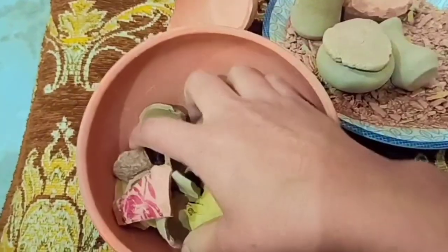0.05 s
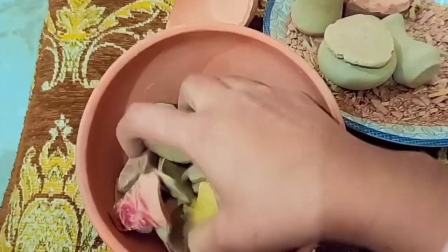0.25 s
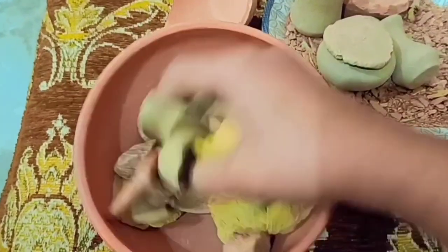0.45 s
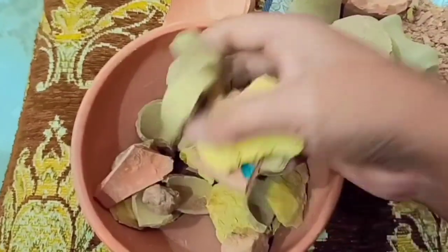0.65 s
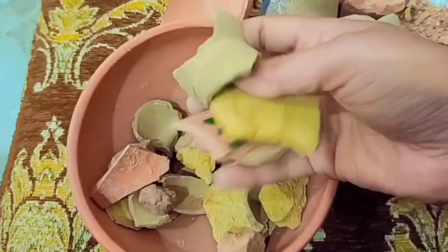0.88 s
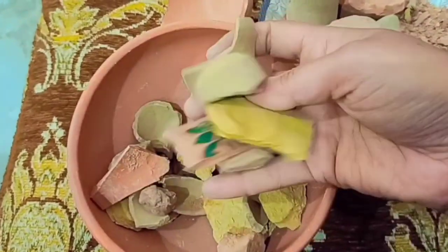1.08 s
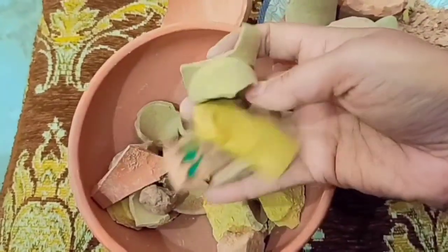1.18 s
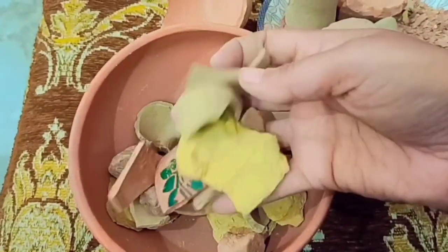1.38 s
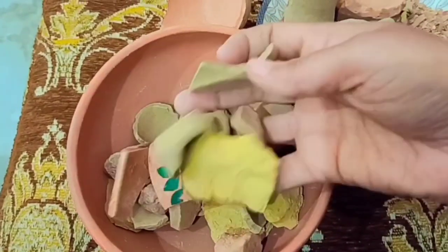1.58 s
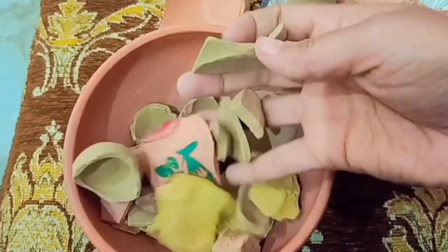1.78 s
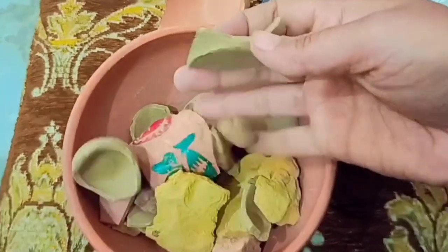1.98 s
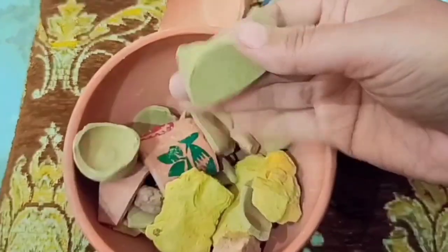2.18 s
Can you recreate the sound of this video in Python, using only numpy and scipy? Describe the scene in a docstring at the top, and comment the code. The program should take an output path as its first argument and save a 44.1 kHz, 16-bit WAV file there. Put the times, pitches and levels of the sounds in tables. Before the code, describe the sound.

Dry clay shards clack and scrape in a ceramic bowl, scooped up and dropped back.

```python
"""Over a faint hum in a small room, a hand scoops dry clay shards out of a ceramic bowl.
Stick-slip friction makes the pile grind and scrape; impacts give dry clacks, set the bowl's modes
ringing and make thin shards ping. In a lull, one flat shard rubs faintly in the lifted hand.
After one second the pieces slide back in, clacking and striking the bowl, and the hum rises
as the last of them settle."""
import sys
import numpy as np
from scipy import signal
from scipy.fft import rfft, irfft
from scipy.io import wavfile
from scipy.ndimage import uniform_filter1d

SR = 44100
rng = np.random.default_rng(int(sys.argv[2]) if len(sys.argv) > 2 else 0)


def generate_wav(signal):
    """Clip the signal to [-1, 1] and save it as 16-bit WAV at the path in sys.argv[1]."""
    frames = np.transpose(np.atleast_2d(signal))
    scaled = np.clip(frames, -1, 1) * 32767
    pcm = np.round(scaled).astype(np.int16)
    wavfile.write(sys.argv[1], SR, pcm)


N = 99225
T = np.arange(N) / SR


def from_db(db):
    """Amplitude ratio of a level in decibels."""
    return 10 ** (np.asarray(db) / 20)


def rms_one(x):
    """Normalisation to unit rms."""
    return x / np.sqrt(np.mean(x ** 2) + 1e-20)


def onset_rms_one(x):
    """Normalisation to unit rms over the first 5 ms."""
    return x / (x[:SR // 200].std() + 1e-12)


def envelope(rows, column=1):
    """Gain over time, interpolated in decibels."""
    rows = np.array(rows)
    return from_db(np.interp(T, rows[:, 0], rows[:, column]))


def colour(x, points):
    """Spectral shaping by (f/Hz, level/dB) points."""
    hz, db = np.transpose(points)
    f = np.maximum(np.fft.rfftfreq(len(x), 1 / SR), 1)
    return irfft(rfft(x) * from_db(np.interp(np.log(f), np.log(hz), db)), len(x))


def butterworth(x, kind, hz):
    """Second-order high-pass or low-pass filter."""
    return signal.sosfilt(signal.butter(2, hz, kind, fs=SR, output="sos"), x)


def resonance(x, hz, width_hz):
    """Forced response of a resonator with unit peak gain."""
    r = np.exp(-np.pi * width_hz / SR)
    feedback = [1, -2 * r * np.cos(2 * np.pi * hz / SR), r * r]
    return signal.lfilter(np.array([1, 0, -1]) * (1 - r * r) / 2, feedback, x)


def decay(t, t60):
    """Exponential damping: 60 dB in t60 seconds."""
    return np.exp(-np.log(1000) * t / t60)


def ring(hz, t60):
    """Free vibration of one damped mode."""
    t = T[:SR // 2]
    return np.sin(2 * np.pi * hz * t) * decay(t, t60)


def add(out, start_s, sound):
    """Superposition of a sound from start_s on."""
    i = int(start_s * SR)
    out[i:i + len(sound)] += sound[:N - i]


# Spectrum of the room noise: f/Hz, level/dB
NOISE_SPECTRUM = [(20, -30), (60, -3), (120, 0), (300, -7), (1000, -20), (3000, -23), (9000, -28),
                  (16000, -42)]
# Envelope of the hum: t/s, level/dB
HUM_ENVELOPE = [(0, -72), (1.7, -72), (1.85, -59), (2.25, -58)]


def background(noise_db=-66.5, hum_hz=126):
    """Superposition of broadband room noise and a low pure tone."""
    noise = from_db(noise_db) * rms_one(colour(rng.standard_normal(N), NOISE_SPECTRUM))
    hum = np.sqrt(2) * envelope(HUM_ENVELOPE) * np.sin(2 * np.pi * hum_hz * T)
    return noise + hum


def slips(slips_per_s=3000, spread_db=3.2, flutter_per_s=90, flutter_db=2.5):
    """Stick-slip friction: rough faces advance in dense, uneven jerks."""
    sizes = from_db(spread_db * np.minimum(rng.exponential(1, N), 4)) * rng.choice([-1, 1], N)
    flutter = np.interp(T * flutter_per_s, np.arange(N), rng.standard_normal(N))
    slipping = rng.random(N) < slips_per_s / SR
    return sizes * slipping * from_db(flutter_db * flutter)


def scraped(modes, shifts_per_s=25, shift_db=5):
    """Frictional excitation: each resonance swells and fades as the contacts shift."""
    out = np.zeros(N)
    for hz, width_hz, db in modes:
        contact = np.interp(T * shifts_per_s, np.arange(N), np.clip(rng.standard_normal(N), -1.5, 1.5))
        force = slips() * from_db(shift_db * contact)
        out += from_db(db) * rms_one(resonance(force, hz, width_hz))
    return rms_one(out)


# Friction in the pile: t/s, grinding level/dB, scraping level/dB
PILE_FRICTION = [(0, -50, -50), (.07, -56.5, -55), (.13, -56, -50.5), (.19, -45, -47), (.25, -41, -42.5),
                 (.345, -44, -37), (.40, -49.5, -43.5), (.45, -48, -48), (.5, -56, -56), (.54, -70, -69.5),
                 (.64, -74.5, -75), (.76, -71, -70), (.83, -80, -76), (.995, -72, -72), (1.03, -43, -46),
                 (1.11, -54, -51), (1.17, -53.5, -60.5), (1.235, -52, -53), (1.26, -69, -70),
                 (1.322, -74, -88), (1.35, -46, -51), (1.46, -57, -58), (1.59, -56, -51), (1.63, -54, -51),
                 (1.65, -38, -38), (1.74, -51, -55), (1.83, -45, -54), (1.88, -54, -64.5),
                 (2.0, -49, -52.5), (2.1, -64.5, -69), (2.25, -69, -79)]
# Spectrum of dull grinding: f/Hz, level/dB
GRIND_SPECTRUM = [(30, -37), (70, -7), (150, -3.5), (300, -1.5), (550, 1), (900, 0.5), (1400, -6),
                  (2200, -7), (4000, -26.5), (16000, -46)]
# Spectrum of gritty scraping: f/Hz, level/dB
GRIT_SPECTRUM = [(30, -55), (1200, -20), (2500, -1), (3600, 2), (4900, 0), (6300, -0.5), (8200, -5),
                 (9300, -5), (10200, -11), (11200, -8), (13600, -22), (16000, -19)]
# Resonances of scraped shards: f/Hz, bandwidth/Hz, level/dB
SHARD_MODES = [(3550, 78, -6), (4450, 110, -7.5), (5600, 85, -5), (6050, 110, -3), (6800, 110, -5.5),
               (7110, 70, 0), (7660, 110, -7.5), (8550, 110, -8), (9210, 100, 0.5), (9550, 130, -6),
               (11130, 180, -9)]


def pile_friction():
    """Sliding friction in the pile radiates broadband noise and drives the shards' resonances."""
    grit = rms_one(colour(slips(), GRIT_SPECTRUM))
    scraping = rms_one(grit + scraped(SHARD_MODES))
    grinding = rms_one(colour(slips(), GRIND_SPECTRUM))
    return envelope(PILE_FRICTION, 1) * grinding + envelope(PILE_FRICTION, 2) * scraping


def thud(rattle_db=-9, rattle_t60=.02):
    """Recoil: the whole shard makes one heavily damped swing and jolts the pile."""
    t = T[:SR // 20]
    jolt = rng.standard_normal(len(t)) * decay(t, rattle_t60)
    impulse = t == 0
    force = from_db(rattle_db) * jolt / np.linalg.norm(jolt) - impulse
    swing = resonance(force, hz=rng.uniform(619, 639), width_hz=1100)
    dulled = butterworth(swing, "low", hz=870)
    return onset_rms_one(butterworth(dulled, "high", hz=253))


def clack(centre_hz, spread_oct=.3, t60=.01, count=12, chatter_db=-4):
    """Contact damping: the pile chokes the modes of a struck shard."""
    t = T[:SR // 20]
    octaves = spread_oct * (np.linspace(-2, 2, count) + rng.uniform(-.18, .15, count))
    bell_curve = np.exp(-(octaves / spread_oct) ** 2 / 2)
    weights = bell_curve * rng.choice([-1, 1], count) * rng.uniform(.73, 1, count)
    modes = np.sin(2 * np.pi * np.outer(centre_hz * 2 ** octaves, t))
    strike = weights @ modes * decay(t, t60)
    lag_s = rng.uniform(.00035, .00141)  # rough faces touch again at once
    chatter = from_db(chatter_db) * np.interp(t - lag_s, t, strike, left=0)
    return onset_rms_one(butterworth(strike + chatter, "high", hz=1100))


def tick(crack_db=-11, crack_t60=.011):
    """Hard contact: meeting edges excite high, choked modes and crush grit with a crack."""
    t = T[:SR // 20]
    noise = colour(rng.standard_normal(len(t)), [(3000, -30), (6000, 0), (10000, 0), (14000, -13)])
    crack = from_db(crack_db) * onset_rms_one(noise * decay(t, crack_t60))
    return clack(centre_hz=6807, spread_oct=.33, t60=.016, count=18) + crack


# Shard on shard: t/s, thud level/dB, clack level/dB, clack centre f/Hz, tick level/dB
COLLISIONS = [(0.112, -52.5, -53, 3800, -47), (0.147, -42, -56.5, 2300, -56.5), (0.17, -48, -45, 2300, -42),
              (0.202, -45, -37.5, 2100, -48.5), (0.209, -37, -37.5, 3100, -34.5),
              (0.2268, -26, -38, 2600, -41), (0.264, -41.5, -43.5, 2100, -35.5),
              (0.286, -44, -42.5, 2600, -44), (0.3087, -42, -30.5, 3200, -36.5),
              (0.323, -44, -14.5, 3500, -17), (0.33, -35, -39.5, 2200, -45.5), (0.343, -53, -38, 3000, -38),
              (0.367, -55, -37, 2100, -40), (0.418, -31, -39.5, 2100, -45), (0.428, -68, -41, 2300, -41),
              (0.4341, -33.5, -40, 2300, -48), (0.439, -50.5, -36, 3100, -48),
              (0.483, -54, -37.5, 2100, -54), (0.5951, -73, -58, 1900, -68),
              (1.0045, -39.5, -39, 2900, -37.5), (1.0184, -28.5, -31, 2300, -34.5),
              (1.0254, -30, -31.5, 2300, -34.5), (1.085, -54, -45, 4400, -44.5),
              (1.1197, -44, -39.5, 3500, -52), (1.137, -65, -43, 3800, -47),
              (1.1794, -46.5, -27.5, 3300, -48), (1.202, -41.5, -46, 3400, -51),
              (1.229, -45.5, -42, 2200, -48.5), (1.3294, -29, -38, 3100, -32.5),
              (1.356, -49.5, -39.5, 2300, -40.5), (1.486, -47, -40.5, 2400, -57),
              (1.514, -50, -49.5, 3100, -65), (1.537, -67, -43.5, 4300, -54.5),
              (1.568, -61, -48.5, 2500, -68), (1.5848, -50, -37, 4400, -48), (1.601, -43, -39, 3000, -37),
              (1.605, -31.5, -36, 2500, -37), (1.636, -33.5, -35, 2100, -39.5),
              (1.6401, -21.5, -22.5, 2100, -27.5), (1.658, -48, -54, 2100, -51),
              (1.762, -46, -46.5, 2300, -53), (1.775, -41.5, -45, 2700, -41.5),
              (1.7822, -35, -26, 3200, -30.5), (1.8131, -58, -32, 4300, -33.5),
              (1.8426, -48, -42, 2600, -50), (1.895, -49, -46, 2100, -55), (1.911, -54, -43.5, 2000, -57),
              (1.933, -45.5, -47, 2200, -54), (1.957, -39.5, -40.5, 2500, -54.5),
              (1.9642, -37, -35.5, 3300, -39.5), (1.978, -40.5, -29.5, 4000, -35.5),
              (2.003, -47.5, -46, 3300, -53), (2.1366, -49.5, -51, 2100, -63.5)]


def knocks():
    """Impact excitation: each collision is the sum of a thud, a clack and a tick."""
    out = np.zeros(N)
    for s, thud_db, clack_db, hz, tick_db in COLLISIONS:
        add(out, s, from_db(thud_db) * thud())
        add(out, s, from_db(clack_db) * clack(hz))
        add(out, s, from_db(tick_db) * tick())
    return out


# Normal modes of the bowl, dragged or struck: f/Hz, level/dB, T60/s
CERAMIC_MODES = [(792, -6, .25), (1090, -17, .15), (1992, -13, .13), (2104, -2, .16), (3740, -10, .15),
                 (4635, -20, .13), (5628, -10, .14), (7195, -12, .12), (7870, -12, .12), (9125, -15, .12),
                 (10730, -16, .1), (11340, -16, .12), (12910, -19, .1)]
# Shards dragging along the bowl's wall: t/s, level/dB
DRAG_ENVELOPE = [(.13, -70), (.19, -39), (.275, -39), (.32, -50), (.39, -44), (.46, -51), (.495, -42),
                 (.515, -76.5)]


def wall_drag(corner_hz=1800):
    """Forced vibration: dragging shards bow all but the bowl's two deepest modes."""
    ringing = np.zeros(N)
    for hz, db, t60 in CERAMIC_MODES[2:]:
        width_hz = np.log(1000) / (np.pi * t60)
        gain = from_db(db) / np.hypot(1, (hz / corner_hz) ** 2)
        ringing += gain * rms_one(resonance(slips(), hz, width_hz))
    steady = ringing / np.sqrt(uniform_filter1d(ringing ** 2, size=1500) + 1e-6)
    touching = T < DRAG_ENVELOPE[-1][0]
    return envelope(DRAG_ENVELOPE) * steady * touching


# Shard on bowl: t/s, level/dB, contact corner f/Hz, added level/dB of the two deepest modes
BOWL_IMPACTS = [(.142, -40, 2500, -8), (.171, -32, 4500, -10), (.243, -31, 3000, -6), (.331, -35, 2500, -6),
                (.369, -24, 1800, -11), (.419, -30.5, 1500, -6), (.484, -33, 1800, -14),
                (.614, -43, 1800, -14), (1.019, -41, 2500, -6), (1.330, -35, 2000, -10),
                (1.486, -42, 4000, -14), (1.605, -32, 2500, -10), (1.641, -21, 5000, -1),
                (1.6629, -23, 1800, -8), (1.688, -29, 1500, 2), (1.896, -47, 2500, -10),
                (2.137, -51, 4000, -10)]


def bowl_strikes(uneven_db=1.5):
    """Modal superposition: soft contacts excite fewer high modes, heavy ones more of the deep modes."""
    out = np.zeros(N)
    modes = np.array([from_db(db) * ring(hz, t60) for hz, db, t60 in CERAMIC_MODES])
    mode_hz = np.array(CERAMIC_MODES)[:, 0]
    k = np.arange(len(modes))
    for s, db, corner_hz, deep_db in BOWL_IMPACTS:
        levels_db = db + deep_db * (k < 2) + uneven_db * rng.standard_normal(len(k))
        strengths = from_db(levels_db) / np.hypot(1, (mode_hz / corner_hz) ** 1.3)
        add(out, s, ((-1) ** k * strengths) @ modes)
    return out


# Notes of thin shards: t/s, f/Hz, level/dB, T60/s
THIN_SHARD_NOTES = [(.212, 9060, -39, .06), (.243, 7020, -35.5, 0.09), (.278, 9050, -35, .09),
                    (.283, 7000, -34, 0.073), (.3115, 5430, -16.5, 0.039), (.324, 9060, -17, 0.023),
                    (.429, 6960, -41.5, .08), (1.019, 7060, -26.5, 0.061), (1.18, 7000, -36, 0.069),
                    (1.3305, 5435, -13.5, 0.021), (1.641, 7190, -27, 0.11), (1.642, 6500, -31, 0.051),
                    (1.754, 9200, -39, 0.028), (1.763, 6600, -36, .02), (1.814, 4650, -32, .03),
                    (1.814, 5890, -30, .025), (1.978, 6500, -20, 0.015)]


def pings():
    """Free vibration: a loose, thin shard rings briefly at a natural frequency."""
    out = np.zeros(N)
    for s, hz, db, t60 in THIN_SHARD_NOTES:
        add(out, s, from_db(db) * ring(hz, t60))
    return out


def table_bump(start_s=.227, level_db=-34):
    """Damped oscillation: the bowl bumps the table with one low thump."""
    out = np.zeros(N)
    thump = butterworth(ring(hz=90, t60=.06), "high", hz=50)
    add(out, start_s, from_db(level_db) * thump)
    return out


# The flat shard rubbing in the lifted hand: t/s, level/dB
HAND_ENVELOPE = [(.63, -85), (.665, -64), (.70, -69), (.74, -60), (.81, -80), (.89, -68), (1.0, -68),
                 (1.05, -85)]
# Its resonances under the fingers: f/Hz, bandwidth/Hz, level/dB
HELD_MODES = [(6150, 350, 0), (9100, 300, -9), (11600, 300, -11)]


def hand_rub():
    """Damping by the fingers broadens the resonances of the rubbed flat shard."""
    return envelope(HAND_ENVELOPE) * scraped(HELD_MODES)


# Impacts on the flat shard in the hand: t/s, level/dB
FLAT_SHARD_IMPACTS = [(1.1381, -30.5), (1.18, -35), (1.206, -39), (1.221, -41), (1.357, -23.5),
                      (1.548, -44), (1.92, -42.5)]
# Its normal modes: f/Hz, level/dB, T60/s
FLAT_SHARD_MODES = [(6016, -0.5, .068), (10640, -14, .08)]


def flat_shard():
    """Linear response: every impact excites the same two modes, and only the level varies."""
    out = np.zeros(N)
    note = sum(from_db(db) * ring(hz, t60) for hz, db, t60 in FLAT_SHARD_MODES)
    for s, db in FLAT_SHARD_IMPACTS:
        add(out, s, from_db(db) * note)
    return out


# Spectrum of the room's reflections: f/Hz, level/dB
REVERB_SPECTRUM = [(60, -7.5), (300, -1), (900, -0.5), (2100, 1), (4000, 0.5), (8000, -2), (15000, -8.5)]


def room(x, t60=.4, level_db=-12, delay_s=.0063):
    """Reverberation: convolution with the diffuse reflections of a small room."""
    t = T[:SR // 2]
    tail = rng.standard_normal(len(t)) * decay(t, t60)
    tail = colour(tail / np.linalg.norm(tail), REVERB_SPECTRUM)
    build_up = np.clip(t / delay_s - 1, 0, 1)
    fade_out = 1 - t / t[-1]
    return from_db(level_db) * signal.fftconvolve(x, tail * build_up * fade_out)[:N]


def scene(bowl_send_db=-6):
    """Superposition of the direct sounds and the reverberation of the impacts."""
    impacts = knocks() + pings() + table_bump() + flat_shard()
    bowl = bowl_strikes()
    reflections = room(impacts + from_db(bowl_send_db) * bowl)
    friction = pile_friction() + wall_drag() + hand_rub()
    return (impacts + bowl + reflections + friction + background())[None]


def record(dry, port_db=16, gate_db=-50.5, gate_slope=.61, gate_range_db=5.5, ceiling=.9, cutoff_hz=15550):
    """Microphone port resonance, downward expansion, soft saturation and a steep low-pass."""
    x = dry + from_db(port_db) * resonance(dry, hz=15150, width_hz=280)
    level_db = 10 * np.log10(np.abs(uniform_filter1d(x ** 2, size=600)) + 1e-12)
    reduction_db = np.clip(gate_slope * (gate_db - level_db), 0, gate_range_db)
    gated = x * from_db(-reduction_db)
    rounded = gated / (1 + (gated / ceiling) ** 4) ** (1 / 4)
    return signal.sosfilt(signal.ellip(10, .1, 70, cutoff_hz, fs=SR, output="sos"), rounded)


dry = scene()
out = record(dry)
generate_wav(out)
```